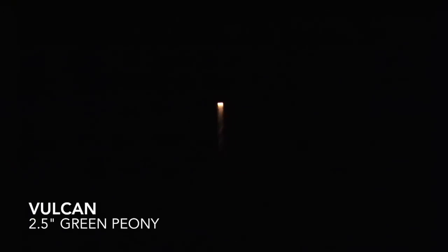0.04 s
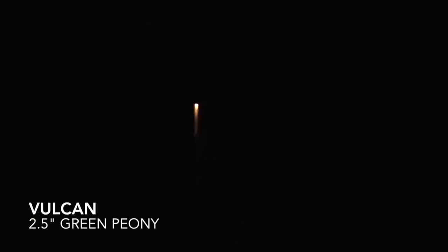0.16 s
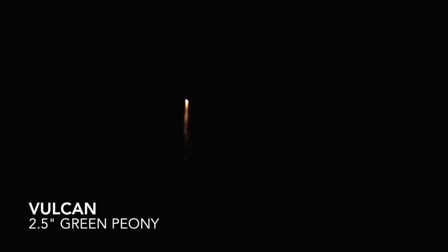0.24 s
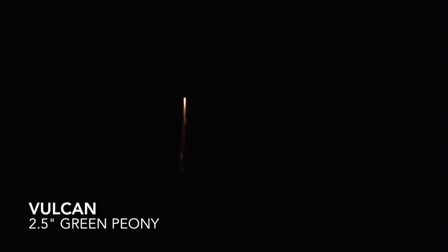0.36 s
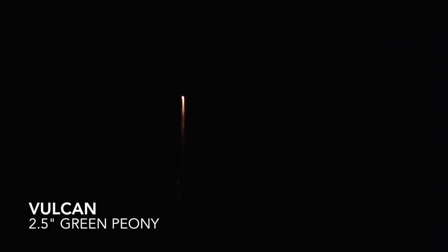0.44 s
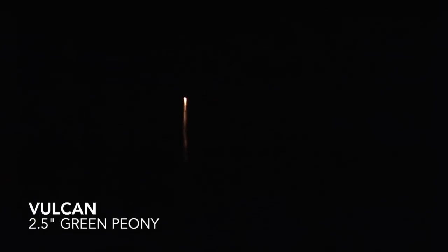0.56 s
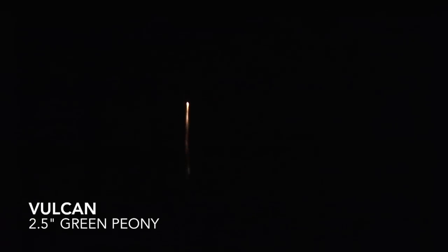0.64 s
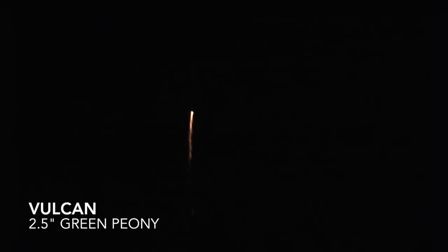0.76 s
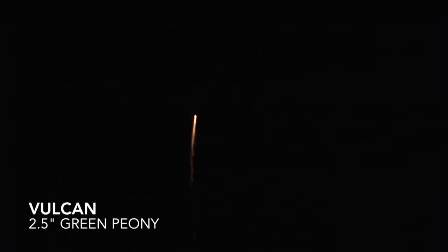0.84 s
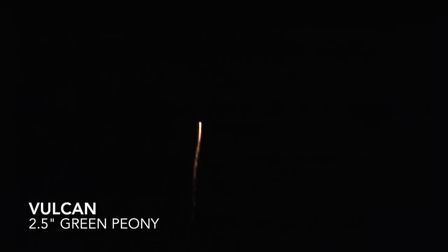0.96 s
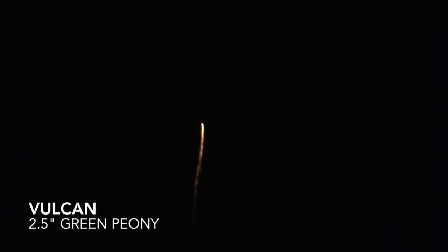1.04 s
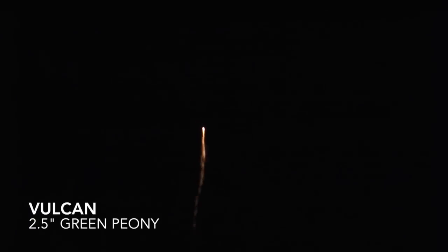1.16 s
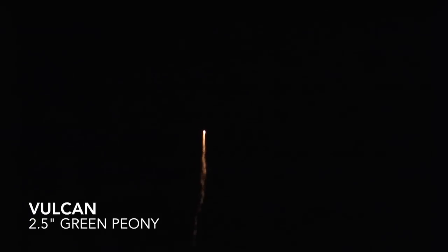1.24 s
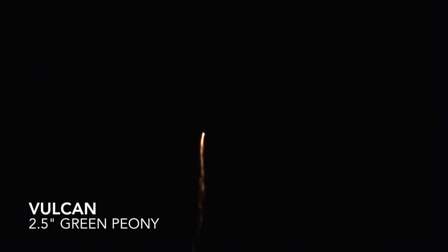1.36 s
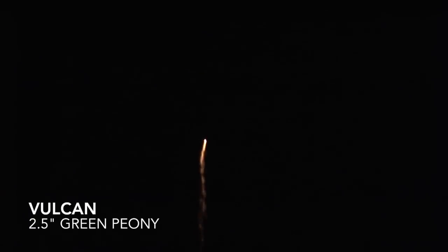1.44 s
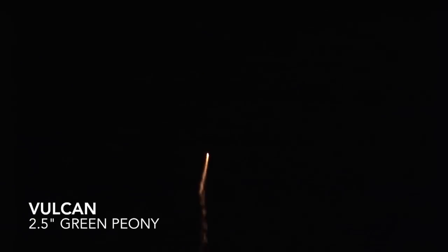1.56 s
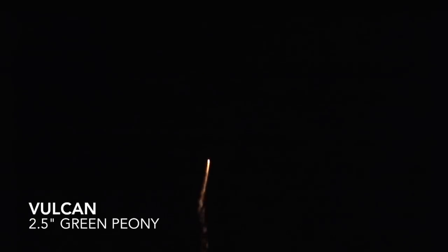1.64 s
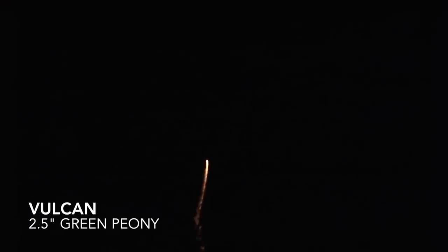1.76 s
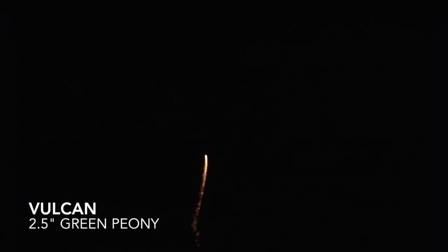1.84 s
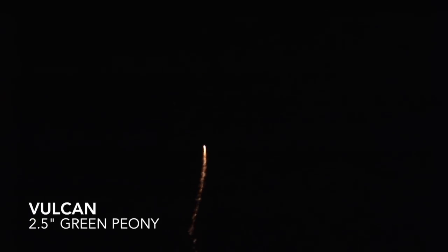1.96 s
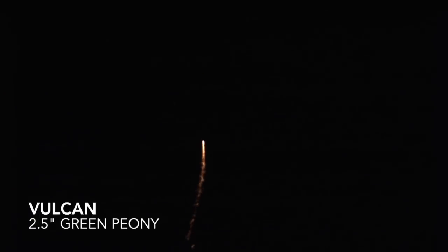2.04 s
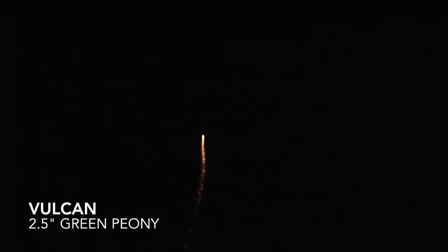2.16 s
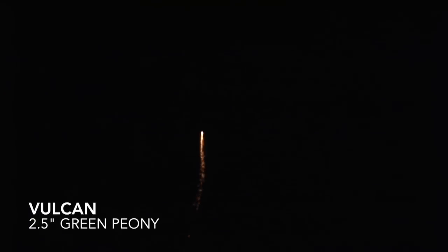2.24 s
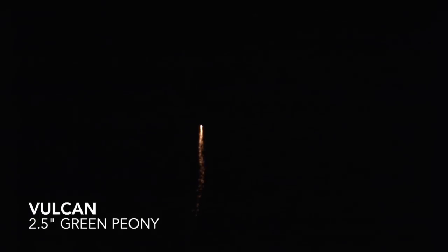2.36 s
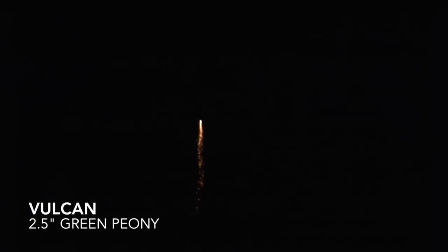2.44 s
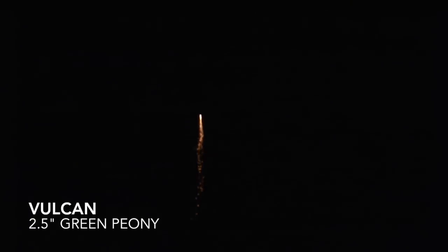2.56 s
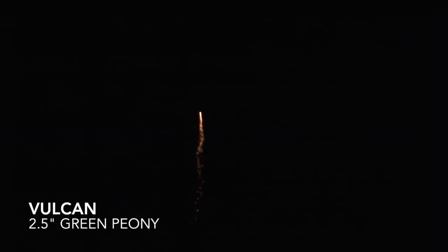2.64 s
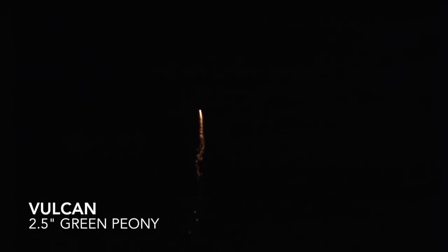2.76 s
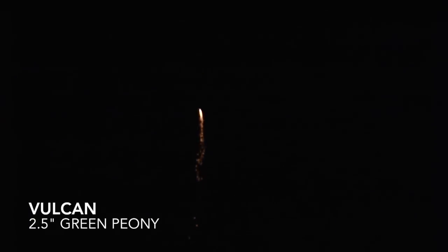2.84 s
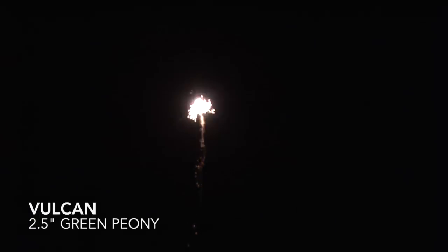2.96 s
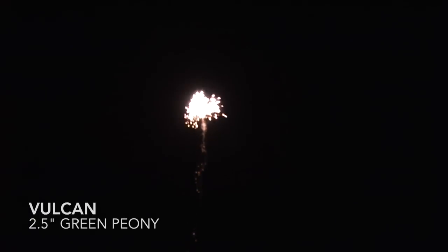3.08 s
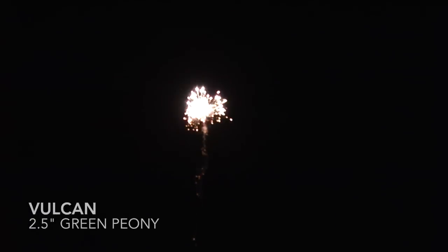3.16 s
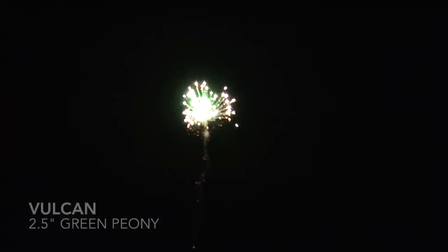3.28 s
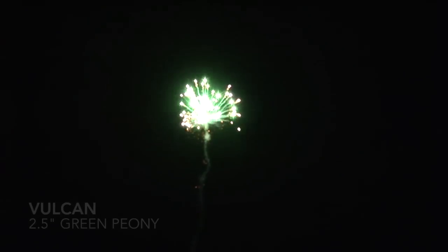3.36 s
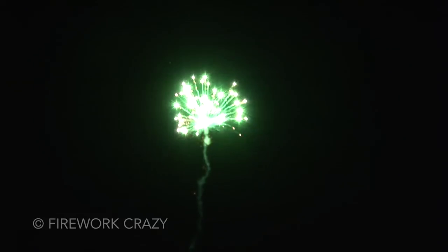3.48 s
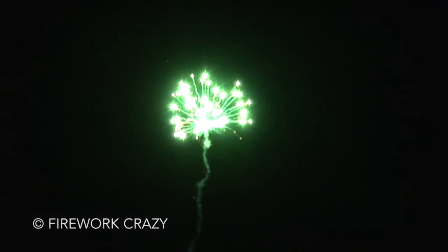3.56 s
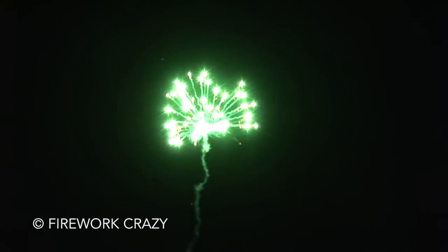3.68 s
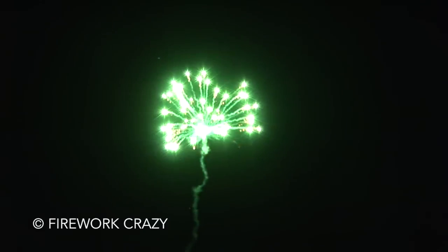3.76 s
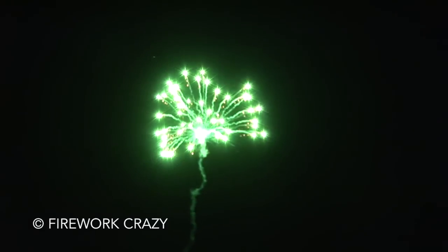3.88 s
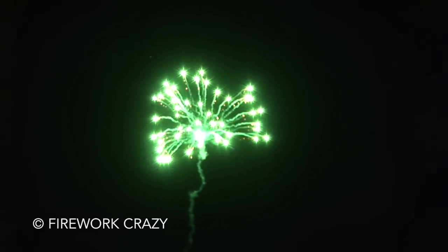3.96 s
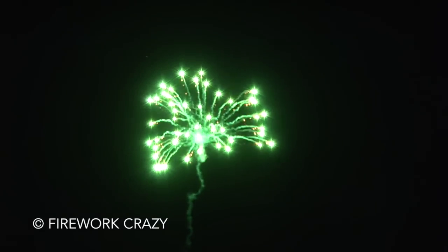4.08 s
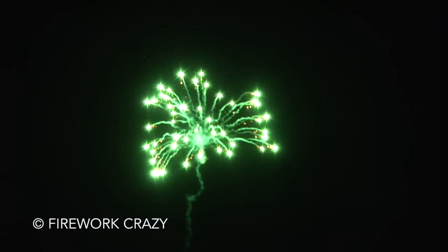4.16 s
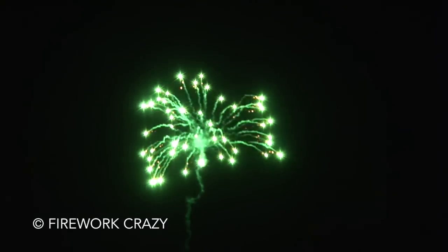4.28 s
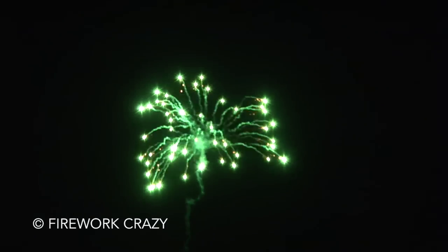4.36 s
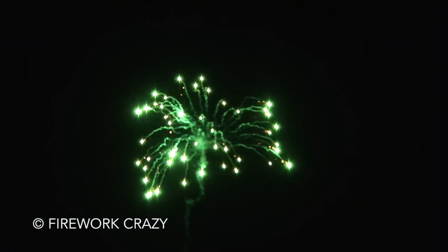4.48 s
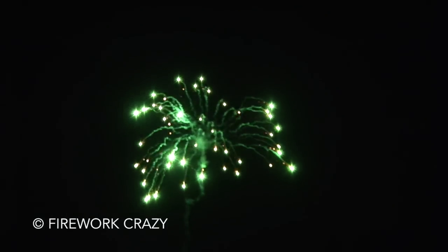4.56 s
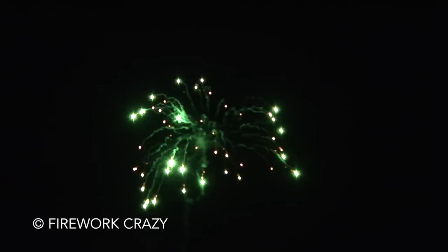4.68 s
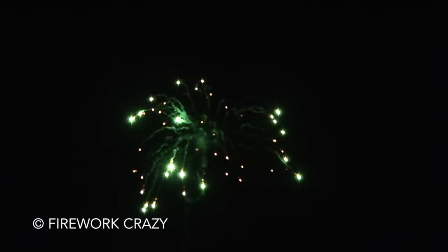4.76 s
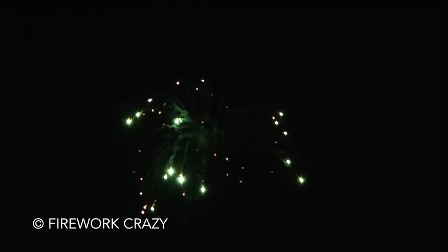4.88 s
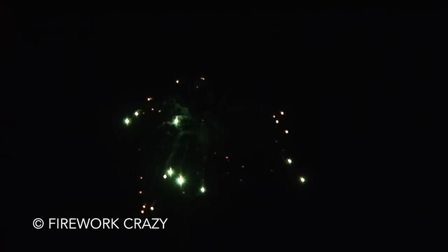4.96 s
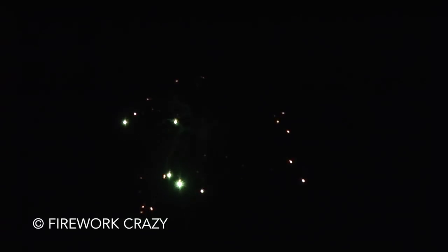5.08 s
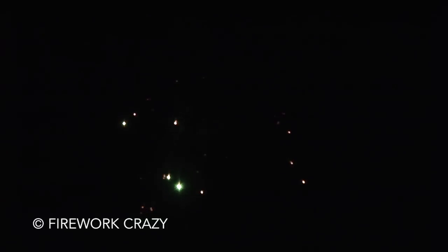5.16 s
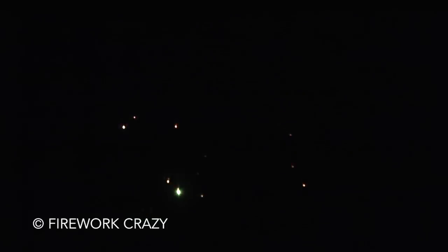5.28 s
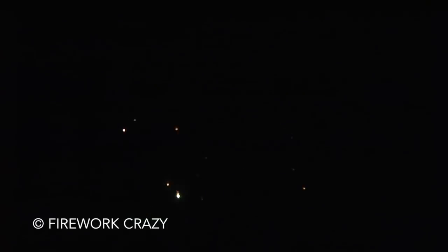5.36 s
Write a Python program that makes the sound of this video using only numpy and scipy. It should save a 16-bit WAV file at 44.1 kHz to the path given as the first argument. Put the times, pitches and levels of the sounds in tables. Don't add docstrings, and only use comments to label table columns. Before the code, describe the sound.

A firework rocket hisses upward, thinning and fluttering, then one sharp overloaded bang cracks and rolls away as an echo in the quiet night.

```python
import sys
import numpy as np
from scipy import signal
from scipy.fft import rfft, irfft, next_fast_len
from scipy.io import wavfile
from scipy.ndimage import uniform_filter1d, map_coordinates

SR = 44100
rng = np.random.default_rng(int(sys.argv[2]) if len(sys.argv) > 2 else 0)


def materialize(psi):
    bounded = np.clip(np.atleast_2d(psi).T, -1, 1)
    quanta = np.round(bounded * 32767).astype(np.int16)
    wavfile.write(sys.argv[1], SR, quanta)


def decibels_to_gain(level_db):
    exponent = np.asarray(level_db, float) / 20
    return 10 ** exponent


N = 238889

# pitch_hz, density_db
JET = [(760, -21), (1300, -8), (1760, -11), (2050, -1.5), (2430, -2.5), (2650, -4.5), (2960, -3),
       (3850, -6.5), (4350, -13), (4560, -21), (4800, -9), (5080, -9.5), (5350, -17), (5800, -19),
       (6200, -26), (7500, -42.5), (14200, -45), (14900, -100)]
FIZZ = [(6000, -29.5), (6600, 0.5), (7400, -8), (8300, 0.5), (8900, -3.5), (9400, 2), (10600, -5),
        (12300, -0.5), (13000, -5.5), (14300, -11), (14700, -21.5), (15000, -71)]
ROAR = [(59, -47), (100, -25), (163, -7.5), (216, -27), (507, -12), (806, -13.5), (1700, -12.5),
        (2210, -32), (3740, -120)]
# pitch_hz, gain_db
LIFT_COLOUR = [(280, -3), (500, 4), (950, -1.5), (1400, -1), (1800, 2.5), (2300, -2), (3100, 1.5),
               (4900, 3.5), (5600, 0)]
# pitch_hz, likeness_ratio
JET_ALIKE = [(130, 1), (290, .83), (640, .5), (1400, 0.48), (2100, 1), (3900, .995), (4800, .8), (6800, .5),
             (15000, .35)]
# lift_off_db, cruising_db, fade_db_per_s
MOTOR = [
    (-23.5, -48, 2.8),
    (-38, -66, 6),
    (-33, -53.5, 3.2),
]
STEEPNESS = [1.05, 1.45, 1.1]
# centre_s, jet_gain_db, fizz_gain_db, half_length_s
SURGES = [(.3, 0, 4, .08), (.41, 2.5, 6, .03), (.47, 1.5, 1, .05), (.6, 2.5, 0, .05), (.78, 4, 5, .035),
          (.845, 3, 6, .035), (.955, 3, 7, .04), (1.08, 1, 4, .08), (1.26, 2, 7, .05), (1.33, 3, 4, .04),
          (1.43, 1, 8, .03), (1.52, 0, 4, .06), (1.69, 5, 10, .06), (1.85, -1.5, 0, .1), (1.934, 1, 4, .02),
          (2.06, 1.5, 8, .05), (2.225, 2, 9, .04), (2.32, 3, 1, .08), (2.5, 2.5, 12, .07), (2.89, 5, 4, .1),
          (3.05, 5, 13, .06)]
# centre_s, gain_db, half_length_s
GROUND_ROAR = (.35, 5, .17)
# peak_s, level_db, rise_of_60_db_s, t60_s, hold_s
FLARE = [
    (3.188, -36.5, .055, .08, .023),
    (3.2, -39, .15, .05, .002),
    (3.247, -42, .25, .006, .001),
]

# pitch_hz, density_db
DRONE = [(9, -30), (15, -11), (27, -11.5), (36, -13.5), (48, -7), (58, -3), (66, -3.5), (76, -9),
         (88, -11.5), (105, -17.5), (130, -29), (170, -56.5), (3000, -120)]
NIGHT_HUSH = [(53, -29.5), (90, -3), (189, -17), (239, -11), (382, -16), (517, -14.5), (572, -25),
              (622, -16.5), (1050, -14.5), (1350, -25), (5000, -54), (6500, -81.5), (11000, -120)]
# pitch_hz, likeness_ratio
NIGHT_ALIKE = [(60, 0.97), (130, 1), (290, 0.94), (640, -0.046), (1410, 1), (3100, 0.91), (6820, -1.1),
               (15000, 0.84)]
# centre_s, swell_db, half_length_s
TRAFFIC = [(.35, 3, .2), (.8, 3, .25), (1.92, 5, .4), (2.5, 1, .3), (3.7, 4, .22), (4.2, 2, .4),
           (4.9, 7, .3), (5.4, 8, .25)]
# multiple_of_shaft_speed, level_over_drone_db
ENGINE = [
    (1, -13.5),
    (2, -1),
    (3, -13.5),
]
# pitch_hz, density_db
SELF_NOISE = [(3000, -12), (4200, 0), (7000, -1), (13900, 0), (14300, -3), (14500, -90)]

# start_s, level_db, pitch_hz, left_over_right_db, t60_s
TICKS = [(1.1593, -24.5, 2770, -0.5, .008), (1.1597, -33, 4800, -5, 0.019), (1.6869, -31.5, 2940, -3, .014),
         (1.6865, -34.5, 4850, 3, 0.023), (4.923, -52.5, 4300, -8.5, 0.015),
         (4.9235, -58, 5750, -12.5, 0.019), (4.9232, -54, 4900, -9, .018), (4.9754, -40, 3800, 2, 0.01),
         (4.9803, -51, 3450, -13, .025)]
# start_s, level_db, pitch_hz, left_over_right_db, t60_s
SPARKS = [
    (3.2393, -22, 2900, 0, .009),
    (3.2452, -23, 2900, 0, .008),
]
# start_s, level_db, pitch_hz, t60_s
SLAPS = [(3.498, -31, 800, .025), (3.509, -30, 1050, .018), (3.5407, -22, 1150, .009),
         (3.552, -29, 700, .02), (3.565, -27, 800, .022), (3.5655, -35, 2100, .014)]
# start_s, level_db, left_over_right_db, t60_s
SPRAYS = [(1.1593, -39.5, -1, .009), (1.6869, -45.5, -3, .014), (4.923, -54, -9, .015),
          (4.9754, -51.5, 2, .01), (4.9803, -57.5, -13, .025)]
# pitch_hz, density_db
SPRAY_COLOUR = [(1500, -30), (3700, -6), (5400, -10), (6300, -11), (8300, -13), (10000, -7.5), (12000, 2.5),
                (13000, -2.5), (14200, -5.5), (16000, -14)]
# centre_s, level_db, pitch_hz, glide_hz_per_s, half_length_s
SQUEAKS = [
    (4.963, -71, 5950, -12000, .007),
    (4.997, -75, 6000, 14000, .012),
    (5.022, -76, 4170, 2500, .024),
]

# arrival_s, level_db, left_over_right_db, dulled_above_hz
PATHS = [(3.24877, 13.3, 0.2, 3040.0), (3.24965, 2.3, 0.6, 1910.0), (3.25013, -0.9, 2.1, 1090.0),
         (3.25057, -3.2, 4.5, 1860.0), (3.25279, -15.0, 2.5, 870.0), (3.25589, 7.8, 1.0, 1170.0),
         (3.25727, -13.5, -0.7, 1740.0), (3.25763, -18.9, -5.5, 5170.0), (3.26061, -4.9, 1.1, 1540.0),
         (3.26191, -8.1, 2.3, 710.0), (3.26273, -8.9, 8.7, 670.0), (3.2645, -12.0, 12.0, 500.0)]
# arrival_s, level_db, left_over_right_db, dulled_above_hz
REBOUNDS = [
    (3.24916, -11, 0, 6000),
    (3.25058, -13, 5, 3500),
]
# pitch_hz, width_hz, level_db
HOUSING = [
    (2870.0, 810.0, 12.5),
    (4810.0, 200.0, 7.4),
]

# pitch_hz, density_db
ROLL_BODY = [(88, -35.5), (150, -9), (214, -18), (381, -9.5), (429, -10), (557, -4.5), (840, -2),
             (1030, -0.5), (2000, -15.5), (2600, -43.5), (4400, -120)]
ROLL_BRIGHT = [(940, -26), (1600, -11.5), (2000, -3.5), (2400, -3.5), (2600, -7.5), (3030, -3.5),
               (3900, -13.5), (4540, -18.5), (4850, -12), (5400, -18), (6000, -17.5), (6500, -47.5),
               (8000, -90)]
SIZZLE = [(8000, -38), (9000, -3), (11000, 2.5), (13000, 1), (14800, -6), (15300, -80)]
# pitch_hz, likeness_ratio
ROLL_ALIKE = [(60, 0.97), (130, 1), (290, 0.87), (640, 0.25), (1410, 0.3), (3100, 0.96), (6820, -1.1),
              (15000, -0.049)]
# pitch_hz, left_over_right_db
ROLL_SIDE = [(60, 1.5), (180, -3), (550, 1.5), (1650, 1), (4970, 0), (15000, 1.5)]
# level_db, t60_s, hold_s, afterglow_db, afterglow_t60_s
NEAR_SCATTER = [
    (-27, .055, .013, -75, 2),
    (-32, .055, .013, -58, .3),
    (-46, .09, .003, -62, 1),
]
# peak_s, body_db, bright_over_body_db, rise_of_60_db_s, t60_s
RETURNS = [(3.275, -42, -10, .01, .3), (3.385, -46, 0, .7, .3), (3.415, -39, -1.5, .15, .4),
           (3.464, -38.5, -9, .5, .07), (3.497, -38.5, -7, .12, .15), (3.572, -42, -8, .3, .25),
           (3.64, -43, -5, .3, .5), (3.69, -36.5, -14.5, .7, 2.1), (4.05, -50, -30, .8, .9),
           (3.92, -46, -20, 1.5, .9), (4.11, -48, -8, .12, .12), (4.25, -53, -16, .4, .5),
           (4.39, -51, -14, .5, .1), (4.49, -55, -11, .3, .4), (4.57, -54.5, -13, .7, .4),
           (4.7, -56.5, -14, .25, 4), (4.93, -56, -15, 1, .8), (5.38, -59.5, -13, 1.5, 2)]
# start_s, peak_db, pitch_hz, t60_s
THUMPS = [
    (3.3902, -33, 150, 0.024),
    (3.4123, -22, 152, 0.039),
]
# peak_s, level_db, rise_of_60_db_s, t60_s, hold_s
FAR_SLOPE = (4.685, -60.5, .25, 1.5, .14)
# pitch_hz, density_db
SLOPE_COLOUR = [(900, -30), (1500, -2.5), (2100, 0.5), (2900, -7.5), (3500, -16), (4500, -24), (6000, -27),
                (7000, -90)]


def unit(x):
    return x / np.sqrt(np.mean(x ** 2) + 1e-20)


def along(points, hz):
    f, v = np.transpose(points)
    return np.interp(np.log(hz + 1), np.log(f + 1), v)


def wobble(rate):
    knots = rng.standard_normal(int(N * rate / SR) + 4)
    return map_coordinates(knots, [np.arange(N) * rate / SR])


def filtered(x, response):
    m = next_fast_len(N + 8192)
    return irfft(rfft(x, m) * response(np.fft.rfftfreq(m, 1 / SR)), m)[..., :N]


def rush(spectrum, alike, grain_db):
    pair = rng.standard_normal((2, N)) * decibels_to_gain(grain_db * wobble(250))

    def mid_side(hz):
        turn = np.arccos(np.clip(along(alike, hz), -1, 1)) / 2
        return decibels_to_gain(along(spectrum, hz)) * [np.cos(turn), np.sin(turn)]

    mid, side = filtered(pair, mid_side)
    return unit(np.array([mid + side, mid - side]))


def swell(s, db, rise, t60, hold=0):
    u = np.arange(N) / SR - s
    return decibels_to_gain(db - 60 * np.maximum(0, np.maximum(-u / rise, (u - hold) / t60)))


def bumps(rows):
    return sum(db * np.exp(-((np.arange(N) / SR - s) / half) ** 2) for s, db, half in rows)


def together(gains):
    return np.sqrt(sum(g ** 2 for g in gains))


def sides(left_over_right_db):
    return np.array([[.5], [-.5]]) * left_over_right_db


def place(track, s, sound):
    start = round(s * SR)
    track[..., start:start + sound.shape[-1]] += sound


def rocket():
    near_s, recede, burnout_s = .06, 1.6, 3.16
    t = np.arange(N) / SR
    flutter = wobble(12)
    jet = rush(JET, JET_ALIKE, grain_db=1.0)
    fizz = rush(FIZZ, JET_ALIKE, grain_db=1.5)
    roar = rush(ROAR, JET_ALIKE, grain_db=1.1)
    jet_db = bumps((s, db, half) for s, db, _, half in SURGES) + 0.62 * flutter
    fizz_db = bumps((s, db, half) for s, _, db, half in SURGES) + 0.94 * flutter
    roar_db = jet_db / 2 + bumps([GROUND_ROAR])
    climb = 0
    layers = zip(MOTOR, STEEPNESS, [jet_db, fizz_db, roar_db], [jet, fizz, roar])
    for (lift_db, cruise_db, fade), steepness, surge_db, far in layers:
        lift = decibels_to_gain(lift_db) * (1 + t / near_s) ** (-recede * steepness)
        cruise = decibels_to_gain(cruise_db - fade * t + surge_db)
        close = filtered(far, lambda hz: decibels_to_gain(along(LIFT_COLOUR, hz)))
        climb = climb + (lift ** 2 * close + cruise ** 2 * far) / together([lift, cruise])
    puff = together(swell(*row) for row in FLARE) * decibels_to_gain(0.5 * wobble(200))
    flare = puff * (jet + decibels_to_gain(-22) * fizz + decibels_to_gain(-8) * roar)
    return swell(0, 0, 1, .05, hold=burnout_s) * climb + flare


def night():
    shaft_hz = 29.5 * (1 + .018 * wobble(3))
    shaft = 2 * np.pi * np.cumsum(shaft_hz) / SR
    engine = sum(decibels_to_gain(db + 1.5 * wobble(6)) * np.sin(k * shaft) for k, db in ENGINE)
    traffic = decibels_to_gain(-3.5) * rush(DRONE, [(60, .998)], grain_db=-1.5)
    drone = decibels_to_gain(-59 + bumps(TRAFFIC)) * (traffic + engine)
    hush = decibels_to_gain(-58.5) * rush(NIGHT_HUSH, NIGHT_ALIKE, grain_db=2.5)
    hiss = decibels_to_gain(-78) * rush(SELF_NOISE, [(5000, .05)], grain_db=0)
    return drone + hush + hiss


def ticks():
    ring, spray = np.zeros((2, N)), np.zeros((2, N))
    t = np.arange(SR // 8) / SR
    slaps = [(s, db, hz, 2, t60) for s, db, hz, t60 in SLAPS]
    for s, db, hz, pan_db, t60 in TICKS + SPARKS + slaps:
        wander = np.cumsum(uniform_filter1d(rng.normal(0, .2, len(t)), size=16))
        tone = np.sin(2 * np.pi * hz * t + wander - wander[0])
        decay = decibels_to_gain(db - 60 * t / t60 + sides(pan_db))
        place(ring, s, decay * (1 - np.exp(-t * hz)) * tone)
    for s, db, pan_db, t60 in SPRAYS:
        decay = decibels_to_gain(db - 60 * t / t60 + sides(pan_db))
        place(spray, s, decay * (1 - np.exp(-t / .0003)))
    for s, db, hz, glide, half in SQUEAKS:
        u = np.arange(N) / SR - s
        phase = 2 * np.pi * (hz * u + glide * u * u / 2) + .5 * wobble(150)
        ring += decibels_to_gain(db + sides(-8)) * np.exp(-(u / half) ** 2) * np.sin(phase)
    return ring + spray * rush(SPRAY_COLOUR, [(1000, .7)], grain_db=0)


def burst():
    shock_s = .00048

    def response(hz):
        s = 1j * hz
        u = 2 * np.pi * s * shock_s
        shock = shock_s * SR * u / (1 + u) ** 2
        housing = 1 + sum(decibels_to_gain(db) * s * w / (c * c + s * s + s * w) for c, w, db in HOUSING)
        bass_cut = s * s / (118 ** 2 + s * s + 230 * s)
        paths = 0
        for arrival, db, pan_db, dull in PATHS + REBOUNDS:
            delay = np.exp(-2 * np.pi * s * arrival)
            paths = paths + decibels_to_gain(db + sides(pan_db)) * delay / (1 + s / dull) ** 2
        return shock * housing * bass_cut * paths

    return filtered(np.eye(1, N), response)


def echo():
    burst_s = 3.2495
    body = rush(ROLL_BODY, ROLL_ALIKE, grain_db=1)
    bright = rush(ROLL_BRIGHT, ROLL_ALIKE, grain_db=0.9)
    sizzle = rush(SIZZLE, JET_ALIKE, grain_db=0.8)
    gains = [swell(s, db, rise, t60) for s, db, _, rise, t60 in RETURNS]
    bright_gain = together(decibels_to_gain(row[2]) * g for row, g in zip(RETURNS, gains))
    far = decibels_to_gain(1.3 * wobble(40)) * (together(gains) * body + bright_gain * bright)
    far = filtered(far, lambda hz: decibels_to_gain(sides(along(ROLL_SIDE, hz))))
    near = 0
    for (db, t60, hold, glow_db, glow_t60), layer in zip(NEAR_SCATTER, [body, bright, sizzle]):
        scatter = swell(burst_s, db, 1e-4, t60, hold)
        afterglow = swell(burst_s, glow_db, 1e-4, glow_t60)
        near = near + together([scatter, afterglow]) * layer
    slope = swell(*FAR_SLOPE) * rush(SLOPE_COLOUR, JET_ALIKE, grain_db=0.5)
    wall, t = np.zeros(N), np.arange(SR // 10) / SR
    for s, db, hz, t60 in THUMPS:
        gain = decibels_to_gain(db + 10.5 - 60 * t / t60) * (1 - np.exp(-t / 0.0057))
        place(wall, s, gain * np.sin(2 * np.pi * hz * t))
    return far + near + wall + slope


def scene():
    return rocket() + night() + ticks() + burst() + echo()


def roll_off(x):
    return signal.sosfilt(signal.butter(12, 16460, fs=SR, output="sos"), x)


def record(dry):
    clipped = np.clip(dry, -.99, .99)
    mix = filtered(clipped, lambda hz: hz < 16460)
    return roll_off(mix)


dry = scene()
out = record(dry)
materialize(out)
```